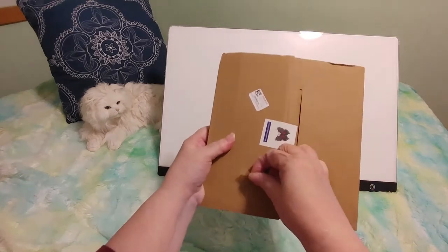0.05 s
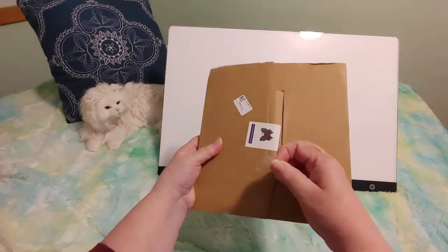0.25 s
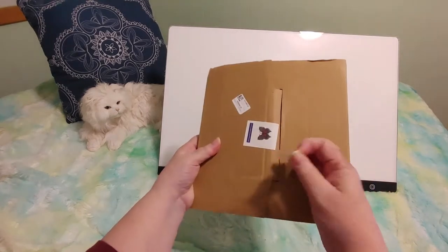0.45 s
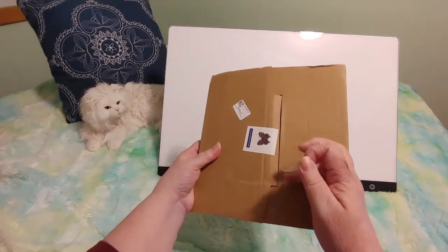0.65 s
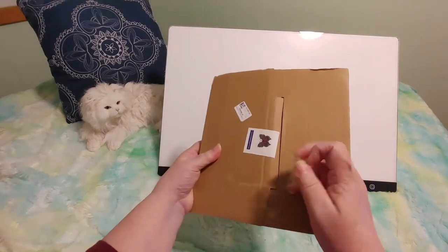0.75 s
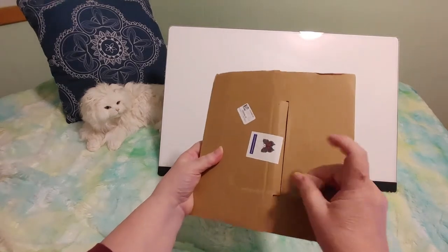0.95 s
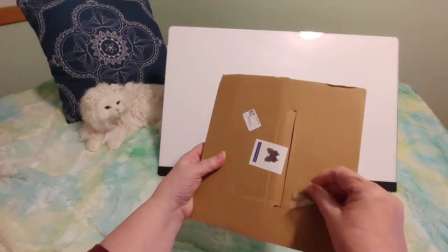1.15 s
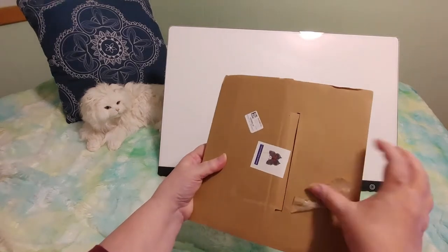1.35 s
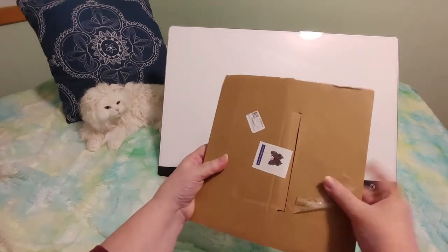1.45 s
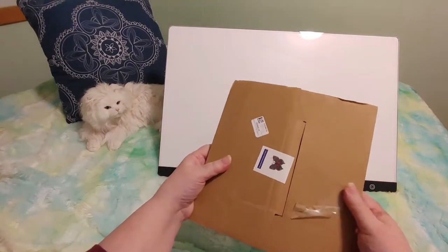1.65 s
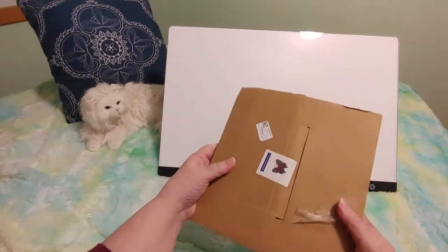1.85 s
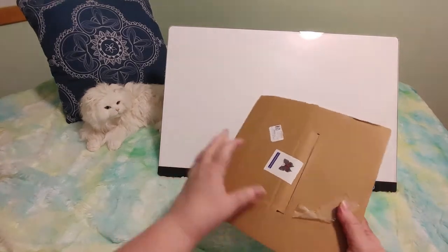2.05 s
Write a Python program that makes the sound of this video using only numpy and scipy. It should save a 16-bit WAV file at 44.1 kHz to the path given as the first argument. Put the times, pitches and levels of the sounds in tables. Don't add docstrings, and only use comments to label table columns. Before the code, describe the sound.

Adhesive tape pulled from cardboard, bright irregular clicks and crackles, then faint finger rubbing, indoors

```python
import sys
import numpy as np
from scipy import signal
from scipy.fft import rfft, irfft, next_fast_len
from scipy.io import wavfile
from scipy.ndimage import uniform_filter1d, map_coordinates

SR = 44100
rng = np.random.default_rng(int(sys.argv[2]) if len(sys.argv) > 2 else 0)


def waveform_to_disk(signal):
    frames = np.transpose(np.atleast_2d(signal))
    scaled = np.clip(frames, -1, 1) * 32767
    samples = np.round(scaled).astype(np.int16)
    wavfile.write(sys.argv[1], SR, samples)


def makeup_ratio(level_db):
    decades = np.asarray(level_db, float) / 20
    return 10 ** decades


N = 92610

# start in seconds, peak in dB, tape pitch in Hz,
# board level in dB against the tape.
SNAPS = [(.0071, -27.5, 6660, -32.5), (0.0499, -26.5, 5900, -21.5), (0.0728, -27.5, 4500, -34.5),
         (0.2107, -47.5, 7100, -5.5), (0.2377, -11.5, 4040, -19), (0.2735, -12, 2536, 0.5),
         (0.3536, -35.5, 7100, -6.5), (0.4289, -39.5, 7240, -14), (0.5144, -38.5, 7500, -36),
         (0.565, -40, 8030, -38), (0.6507, -30.5, 7860, -9.5), (0.6575, -24.5, 9500, -18),
         (0.7399, -15, 8200, -6.5), (0.8188, -21.5, 9200, -19), (0.9117, -24.5, 6600, -19.5),
         (.9896, -38, 8180, -13), (0.9326, -15, 8360, -15.5), (0.9814, -26.5, 8600, -27),
         (1.023, -23, 6800, -25), (1.0402, -29.5, 8030, -17.5), (1.0546, -21.5, 7840, -55),
         (1.0573, -25.5, 8700, -12.5), (1.2106, -34, 6000, -25), (1.2209, -30, 6130, -16),
         (1.269, -36, 6900, -33), (1.2745, -17.5, 7160, -37.5), (1.4483, -54.5, 7460, -36),
         (1.4799, -44.5, 7470, -33.5), (1.5766, -42, 4740, 1.5)]
# start in seconds, peak in dB, tape pitch in Hz.
TICKS = [(0.0587, -31, 6850), (0.0745, -31.5, 4030), (0.0836, -28, 4110), (0.0897, -27, 4000),
         (0.103, -30, 3400), (0.1126, -31.5, 4100), (0.114, -24.5, 4100), (0.1282, -28.5, 4000),
         (.134, -33, 3696), (0.145, -32.5, 2847), (.1528, -39, 3976), (0.1641, -39, 3965),
         (0.2488, -15, 4900), (0.2542, -15.5, 3500), (0.3612, -38, 7180), (0.4255, -46, 7630),
         (0.5278, -26.5, 7490), (0.535, -27, 6810), (0.545, -36, 5000), (.613, -42.5, 5900),
         (0.6187, -41, 5980), (0.627, -40.5, 5900), (0.6878, -33, 8120), (0.7485, -24, 7950),
         (0.7533, -24, 7920), (0.7793, -29, 7970), (0.8104, -25.5, 7870), (0.8307, -23, 8230),
         (0.937, -25.5, 8030), (.96, -35.5, 8020), (0.9633, -36, 7720), (1.0265, -32.5, 7490),
         (1.2309, -49, 6500), (1.2808, -31.5, 6760), (1.2864, -33.5, 6850), (1.3069, -28.5, 7430),
         (1.3115, -31.5, 6310), (1.388, -56, 7880), (1.486, -68, 7200), (1.633, -45.5, 8000)]
# start in seconds, length in seconds, level in dB, tape pitch in Hz,
# board level in dB against the tape.
SLIP_RUNS = [(0.067, 0.026, -35.5, 4200, -41.5), (0.1, 0.06, -44.5, 3520, -24),
             (0.192, 0.045, -48, 2700, -13.5), (0.229, 0.007, -36.5, 3000, 8.5),
             (0.2342, 0.0038, -29.5, 4150, 6.5), (.241, 0.0054, -24, 4300, 3.5),
             (0.25, 0.014, -22.5, 4470, -7), (.26, 0.013, -25, 3500, -2.5),
             (0.272, 0.032, -31, 2780, -31.5), (0.287, 0.042, -43, 2570, -17.5),
             (0.34, 0.079, -60.5, 2520, 8.5), (0.525, 0.011, -46, 7000, -14.5),
             (0.55, 0.025, -45, 8400, -27), (0.649, 0.024, -34, 7900, -23),
             (0.7373, 0.0055, -27.5, 6200, -33), (0.749, 0.052, -44, 7160, -4),
             (0.811, 0.033, -38, 8200, -15.5), (0.917, 0.0062, -43.5, 5640, -3.5),
             (0.95, 0.0053, -41.5, 7800, -3.5), (1.033, 0.062, -50, 8350, -12.5),
             (1.16, 0.041, -56.5, 2830, -2), (1.307, .08, -52, 14500, -26),
             (1.22, 0.011, -45.5, 5060, -6.5), (1.279, 0.047, -44, 7100, -31), (1.3, .04, -46, 4330, -6.5),
             (1.339, 0.055, -51, 8200, -15.5), (1.463, 0.0292, -62.5, 7400, -26.5),
             (1.574, 0.0151, -46, 4930, 2), (1.592, 0.017, -58, 4510, 4)]
# frequency in Hz, level in dB.
TAPE_TONE = [(300, -35.5), (2200, -14.5), (2900, -7.5), (6000, -3), (8500, -1), (12300, -14.5),
             (13000, -14.5), (16000, -20)]
# frequency in Hz, width in Hz, level in dB.
BOARD_MODES = [(433, 180, -3.5), (628.4, 140, -4), (750, 120, -3.5), (910, 116, 5.5), (1200, 200, 5),
               (1645, 250, 1), (2786, 450, -3.5)]
# frequency in Hz, width in Hz, level in dB.
BOOM_MODES = [(60.6, 70, -20), (217, 67, -3.5), (326, 98, -4.5), (460, 89, -2), (731, 33, 4),
              (581.5, 60, -7)]
# start in seconds, peak in dB, push time in seconds.
KNOCKS = [(0.236, -41, 0.00024), (.25, -27.5, .001), (0.2738, -20.5, 0.00044), (.278, -28, 0.0034),
          (0.651, -44, 0.00048), (0.811, -46, 0.00062), (1.054, -77, 0.0013), (1.223, -55, 0.0013),
          (1.309, -56, 0.0012), (.74, -41, 0.0012), (0.934, -57.5, 0.0016), (1.578, -32, 0.00062),
          (1.5838, -41, 0.00082)]
# time in seconds, level in dB.
RUB = [(0, -68), (.04, -55), (.15, -46), (.18, -75), (.45, -55), (.5, -74.5), (.6, -56), (.72, -52),
       (.8, -49.5), (.87, -50), (1.1, -62), (1.15, -60), (1.19, -61), (1.26, -60), (1.42, -80),
       (1.7, -72.5), (1.94, -64), (2.1, -76)]
# time in seconds, level in dB.
SLIDE = [(0, -40), (.15, -47.5), (.185, -49), (.4, -56), (.48, -68.5), (.6, -53.5), (.72, -51.5),
         (.88, -46), (1.0, -45.5), (1.16, -57.5), (1.385, -47.5), (1.415, -106.5), (1.6, -57.5),
         (1.77, -64), (1.84, -52.5), (1.88, -56.5), (1.99, -50.5), (2.09, -70)]
# frequency in Hz, level in dB.
SKIN_TONE = [(1500, -24.5), (2350, -10.5), (2900, -8), (3900, -5), (5800, -9), (7900, 1.5), (11700, -16.5),
             (16000, -20)]
# start in seconds, length in seconds,
# level in dB, first pitch in Hz, last pitch in Hz.
SCRAPES = [(0.019, 0.15, -53, 1423, 1200), (0.335, 0.053, -47, 1092, 938), (0.787, 0.044, -40, 1200, 1200),
           (1.154, 0.098, -52, 1036, 912), (1.305, .095, -48, 1500, 894), (1.6, .045, -54.5, 952, 1042),
           (0.033, 0.12, -64, 195.3, 204), (0.338, 0.039, -48.5, 1182, 1327), (.438, 0.023, -56, 410, 445),
           (0.618, 0.05, -52, 1200, 1230), (0.713, 0.04, -48.5, 1200, 1274),
           (1.935, 0.017, -59.5, 1183, 1150)]
# time in seconds, share cancelled from 0 to 1.
SHADOW = [(0, 0.99), (.22, 0.5), (.25, 0.35), (.42, 0), (.5, 0.74), (.62, 0.33), (.7, 0.2), (1.4, 0.39),
          (1.5, 0.6), (2.1, 0)]
# frequency in Hz, time to fall 60 dB in seconds.
ROOM_DECAY = [(200, 0.073), (1000, 0.13), (4000, 0.15), (12000, 0.023)]
# frequency in Hz, level in dB.
AIR_TONE = [(12, -51), (20, -24), (123, -4.5), (255, -2), (642, -7.5), (976, -5.5), (5680, -27),
            (7950, -11.5), (16000, -34.5)]
# frequency in Hz, width in Hz, level in dB.
MIC_PEAKS = [(8200, 960, -1), (11690, 800, 10), (9520, 480, -4), (2150, 456, 8), (5620, 240, -2.5)]

BOARD_ALIKE, BOOM_ALIKE, ROOM_ALIKE = 0.73, 0.53, 0.69


def unit(x):
    return x / np.sqrt(np.mean(x ** 2) + 1e-20)


def along(points, hz):
    f, v = np.transpose(points)
    return np.interp(np.log(hz + 1), np.log(f + 1), v)


def curve(rows):
    s, v = np.transpose(rows)
    return np.interp(np.arange(N) / SR, s, v)


def wobble(rate):
    knots = rng.standard_normal(int(N * rate / SR) + 4)
    return map_coordinates(knots, [np.arange(N) * rate / SR])


def filtered(x, response):
    n = x.shape[-1]
    m = next_fast_len(n + 4096)
    h = response(np.fft.rfftfreq(m, 1 / SR))
    h = h / np.sqrt(np.mean(abs(h) ** 2))
    return irfft(rfft(x, m) * h, m)[..., :n]


def modes(table):
    def response(f):
        total = 0
        for k, (centre, width, db) in enumerate(table):
            total = total + (-1) ** k * makeup_ratio(db) * 1j * f * width / (centre ** 2 - f * f + 1j * f * width)
        return total
    return response


def pair(n, alike):
    a, b, c = rng.standard_normal((3, n))
    share = np.clip(alike, 0, 1)
    return np.sqrt(share) * a + np.sqrt(1 - share) * np.array([b, c])


def add(out, s, x):
    i = max(round(s * SR), 0)
    out[:, i:i + x.shape[1]] += x[:, :N - i]


def release(force, hz, board_db, crack=0):
    pitch_db, pitch_q, boom_db = 8, 6.7, -10.5
    n = len(force)
    blow = crack * (np.arange(n) == np.argmax(force))

    def film(f):
        damping = 1j * f * hz / pitch_q
        return makeup_ratio(along(TAPE_TONE, f)) * (1 + makeup_ratio(pitch_db) * damping / (hz * hz - f * f + damping))

    rustle = filtered(force * (pair(n, 0.17) - blow), film)
    board = filtered(force * (pair(n, BOARD_ALIKE) - 2 * blow), modes(BOARD_MODES))
    boom = filtered(force * pair(n, BOOM_ALIKE), modes(BOOM_MODES[1:]))
    parts = np.array([rustle, board, boom])
    parts = parts * np.linalg.norm(force) / np.linalg.norm(parts, axis=2, keepdims=True)
    return parts[0] + makeup_ratio(board_db) * (parts[1] + makeup_ratio(boom_db) * parts[2])


def jolt(t, db, t60_s, rise_s):
    return makeup_ratio(db - 60 * t / t60_s) * (1 - np.exp(-t / rise_s))


def slips(t, length, db):
    slips_per_s, slip_t60_s, spread_db = 2500, 0.0047, 2.17
    rise_s, fall_t60_s = 0.00067, 0.012
    chance, size = rng.random((2, len(t)))
    hits = (chance < slips_per_s / SR) * makeup_ratio(-spread_db * np.log(size + 0.0024))
    force = unit(signal.lfilter([1], [1, -makeup_ratio(-60 / (slip_t60_s * SR))], hits) + 1.7)
    fall_db = 60 * np.clip(t - length, 0, 1) / fall_t60_s
    return force * np.clip(t / rise_s, 0, 1) * makeup_ratio(db - fall_db)


def tape():
    snap_db, snap_board_db, tick_db, tick_board_db = 4, 4.5, 3, -18
    out, t = np.zeros((2, N)), np.arange(SR // 6) / SR
    for s, db, hz, board_db in SNAPS:
        force = jolt(t, db + snap_db, t60_s=0.009, rise_s=0.0004)
        add(out, s, release(force, hz, board_db + snap_board_db, crack=6))
    for s, db, hz in TICKS:
        add(out, s, release(jolt(t, db + tick_db, t60_s=0.009, rise_s=0.0006), hz, tick_board_db))
    for s, length, db, hz, board_db in SLIP_RUNS:
        add(out, s, release(slips(t, length, db), hz, board_db))
    return out


def knocks():
    knock_db, grit = 20, 0.9
    out, t = np.zeros((2, N)), np.arange(SR // 4) / SR
    for s, db, push_s in KNOCKS:
        rough = 1 + grit * pair(len(t), BOOM_ALIKE)
        push = np.exp(-t / push_s) * rough / np.sqrt(push_s * SR)
        add(out, s, makeup_ratio(db + knock_db) * filtered(push, modes(BOOM_MODES)) / 2)
    return out


def fingers():
    rub_noise = filtered(pair(N, BOARD_ALIKE), lambda f: modes(BOARD_MODES[2:-1])(f) ** 2)
    rub = makeup_ratio(curve(RUB) - 4.0 + 0.96 * wobble(25.2) + 3.8 * wobble(190)) * rub_noise
    low_noise = filtered(pair(N, BOOM_ALIKE), modes(BOOM_MODES))
    low = makeup_ratio(curve(RUB) - 13.5 + 1.1 * wobble(20)) * low_noise
    skin_noise = filtered(patchy(pair(N, 0.1)), lambda f: makeup_ratio(along(SKIN_TONE, f)))
    slide = makeup_ratio(curve(SLIDE) - 2.5 + 1.9 * wobble(30.95) + 0.5 * wobble(340)) * skin_noise
    return rub + low + slide + scrapes()


def patchy(x):
    patch_db = 2.5
    z = signal.stft(x, nperseg=512)[2]
    field = rng.standard_normal(z.shape[1:])
    field = uniform_filter1d(uniform_filter1d(field, size=8, axis=0), size=8, axis=1)
    return signal.istft(z * makeup_ratio(patch_db * unit(field)), nperseg=512)[1][:, :N]


def scrapes():
    scrape_q = 8
    out = np.zeros((2, N))
    for s, length, db, first_hz, last_hz in SCRAPES:
        u = np.arange(round(length * SR)) / (length * SR)
        cycles = length * (first_hz * u + (last_hz - first_hz) * u * u / 2)

        def narrow():
            noise = pair(SR // 4, BOARD_ALIKE)
            return filtered(noise, lambda f: 1 / (1 + (f * scrape_q / first_hz) ** 2))[:, :len(u)]

        friction = ((narrow() + 1j * narrow()) * np.exp(2j * np.pi * cycles)).real
        swell = np.sqrt(np.abs(np.sin(np.pi * u)))
        add(out, s, makeup_ratio(db + 3.1 * wobble(159)[:len(u)]) * swell * friction)
    return out


def shadowed(x):
    centre_hz, width_hz = 2110, 490
    m = next_fast_len(N + 4096)
    f = np.fft.rfftfreq(m, 1 / SR)
    band = irfft(rfft(x, m) * np.exp(-((f - centre_hz) / width_hz) ** 4), m)[:, :N]
    return x - np.clip(curve(SHADOW), 0, 1) * band


def room(x):
    thin_hz, delay = 1480, 130
    hz, t, z = signal.stft(pair(SR // 3, ROOM_ALIKE), SR, nperseg=256)
    decay = makeup_ratio(-60 * t / along(ROOM_DECAY, hz)[:, None])
    tilt = (2.9 + hz / (hz + thin_hz))[:, None]
    tail = signal.istft(z * decay * tilt, SR, nperseg=256)[1]
    late = np.pad(x, ((0, 0), (delay, 0)))
    return signal.fftconvolve(late, tail / np.linalg.norm(tail[0]), axes=1)[:, :N]


def air():
    return makeup_ratio(-67.5) * filtered(pair(N, 0.5), lambda f: makeup_ratio(along(AIR_TONE, f)))


def scene():
    near = tape() + knocks()
    room_db = -8
    return shadowed(near + makeup_ratio(room_db) * room(near) + fingers() + air())


def low_pass(x):
    return signal.sosfilt(signal.butter(12, 16650, fs=SR, output="sos"), x)


def record(dry):
    left_db, lag_s, low_cut_hz, knee_hz = 1.06, 0.0039, 97, 15950

    def colour(f):
        peaks_db = sum(db * np.exp(-((f - c) / w) ** 2) for c, w, db in MIC_PEAKS)
        low_cut = 0.72 + 1 / (1 + (low_cut_hz / (f + 1)) ** 4)
        return makeup_ratio(peaks_db) * low_cut * makeup_ratio(-14 * (f > knee_hz))

    late_right = np.roll(dry[1], round(lag_s * SR))
    mix = np.array([dry[0] * makeup_ratio(left_db), late_right * makeup_ratio(-left_db)])
    return low_pass(filtered(mix, colour))


dry = scene()
out = record(dry)
waveform_to_disk(out)
```